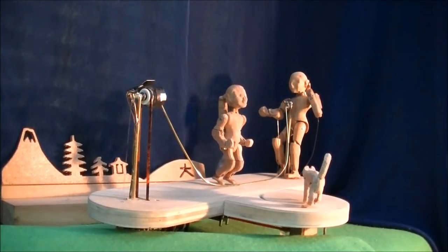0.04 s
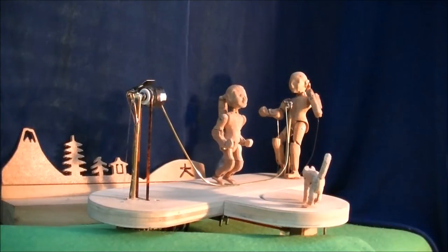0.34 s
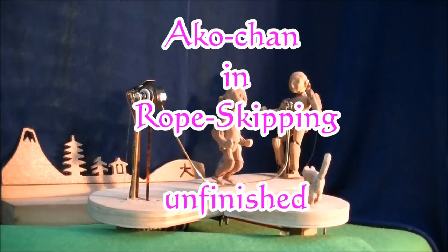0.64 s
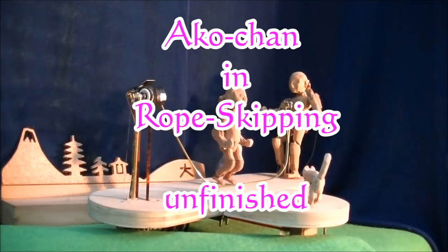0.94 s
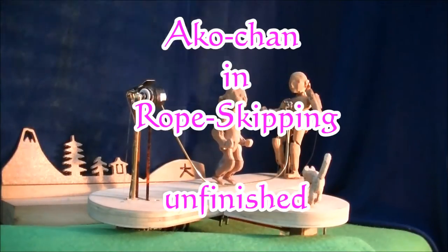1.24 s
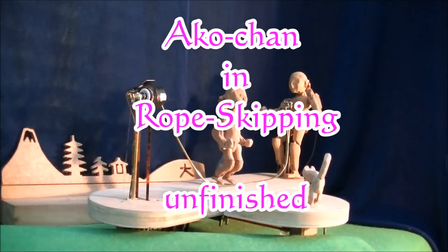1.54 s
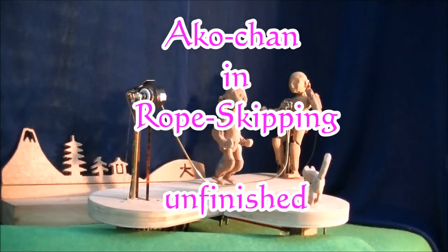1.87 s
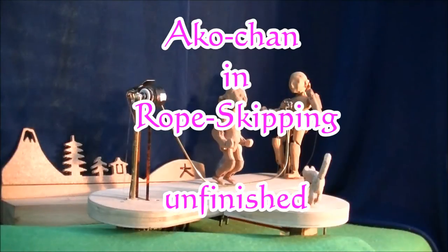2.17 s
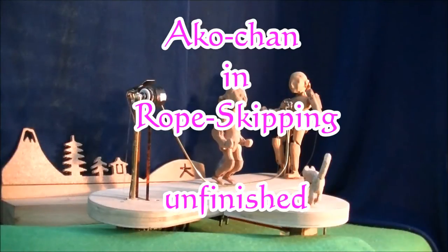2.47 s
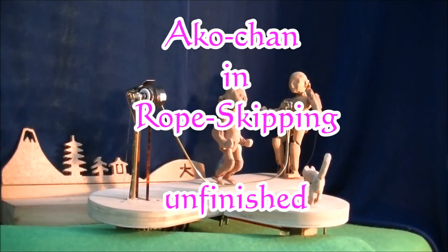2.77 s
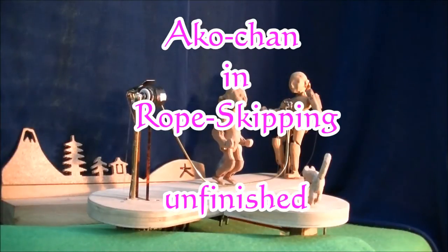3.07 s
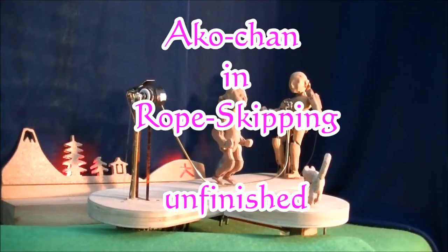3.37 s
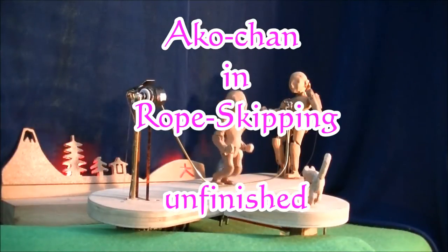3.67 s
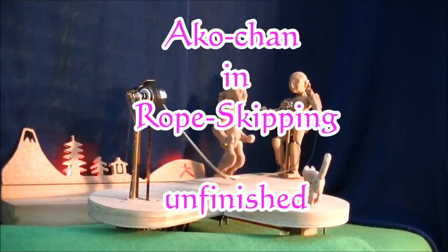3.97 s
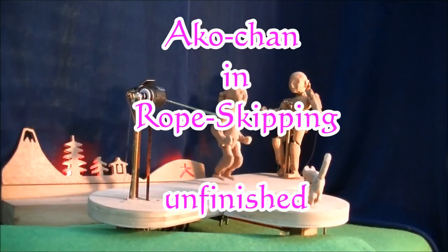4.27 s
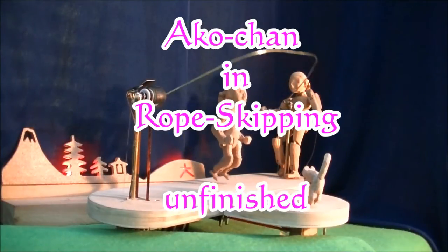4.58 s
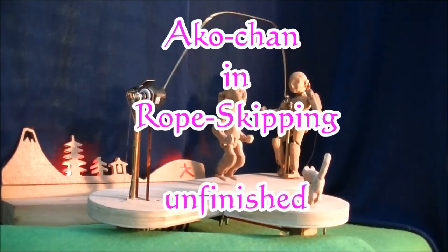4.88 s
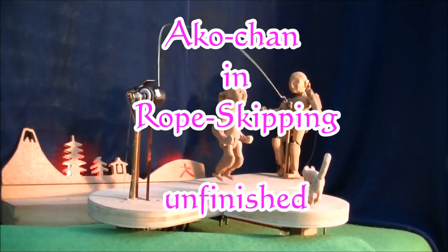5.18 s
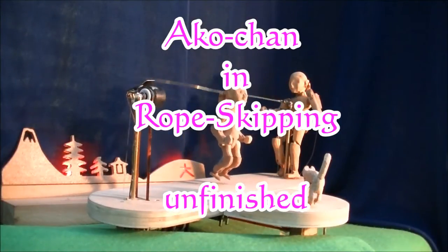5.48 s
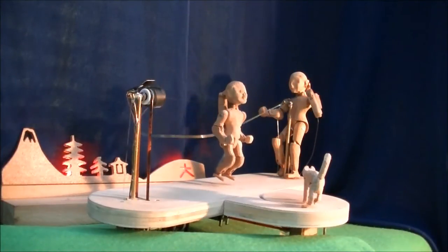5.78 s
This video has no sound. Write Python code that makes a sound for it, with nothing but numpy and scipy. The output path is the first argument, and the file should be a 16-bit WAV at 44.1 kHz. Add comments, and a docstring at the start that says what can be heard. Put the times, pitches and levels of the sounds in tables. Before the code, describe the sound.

Light knocks, ticks and scuffs on wood, followed by a little electric motor and gears whirring steadily in a small room.

```python
"""A small room, a wooden automaton on a table, heard close and near mono over a steady room tone.
Handling rubs, knocks and scuffs the base and rings its modes; sliding parts squeak, metal parts tick.
At 3.4 s its three-pole motor starts: the free gears rasp and a dry bearing squeals. Under the load of
a rope it settles to a whirr of gear teeth, mesh lines and brush hiss, with clacks in step with the shaft.
A low hum joins as the rope falls."""
import sys
import numpy as np
from scipy import signal
from scipy.fft import rfft, irfft, next_fast_len
from scipy.io import wavfile
from scipy.ndimage import uniform_filter1d, map_coordinates

SR = 44100
rng = np.random.default_rng(int(sys.argv[2]) if len(sys.argv) > 2 else 0)


def wav_record(signal):
    """Record a signal, one row per channel, as 16-bit PCM in the file named by sys.argv[1]."""
    frames = np.transpose(np.atleast_2d(signal))
    bounded = np.clip(frames, -1, 1)
    # unit amplitude maps onto the largest positive 16-bit level
    quanta = np.round(bounded * 32767).astype(np.int16)
    wavfile.write(sys.argv[1], SR, quanta)


N = 265482
TIME_S = np.arange(N) / SR


def amp(db):
    """Decibels to gain."""
    return 10 ** (np.asarray(db) / 20)


def unit(x):
    """Scale to rms 1."""
    return x / np.sqrt(np.mean(x ** 2) + 1e-20)


def along(points, hz):
    """Interpolate (Hz, value) points on a log axis."""
    f, v = np.transpose(points)
    return np.interp(np.log(hz + 1), np.log(f + 1), v)


def ramp(start_s, end_s):
    """Linear rise from 0 to 1."""
    return np.clip((TIME_S - start_s) / (end_s - start_s), 0, 1)


def wobble(rate_hz):
    """Smooth random curve, rate_hz knots a second."""
    return map_coordinates(rng.standard_normal(int(N * rate_hz / SR) + 4), [TIME_S * rate_hz])


def filtered(x, response):
    """Apply a frequency response by FFT."""
    n = x.shape[-1]
    m = next_fast_len(n + SR // 4)
    return irfft(rfft(x, m) * response(np.fft.rfftfreq(m, 1 / SR)), m)[..., :n]


def body(modes, f):
    """Causal response of (Hz, width Hz, dB) resonances, alternating in sign."""
    return sum((-1) ** k * amp(db) * 1j * f * width / (hz * hz - f * f + 1j * f * width)
               for k, (hz, width, db) in enumerate(modes))


def above(f, edge_hz, order=4):
    """High-pass gain."""
    return 1 / np.sqrt(1 + (edge_hz / (f + 1)) ** (2 * order))


def below(f, edge_hz, order=4):
    """Low-pass gain."""
    return 1 / np.sqrt(1 + (f / edge_hz) ** (2 * order))


def band(f, hz, width_hz, order=1):
    """Band-pass gain; full width at half height."""
    return 1 / (1 + (2 * (f - hz) / width_hz) ** (2 * order))


def noise(response, size=N):
    """Coloured noise, rms 1."""
    return unit(filtered(rng.standard_normal(size), response))


def add(track, start_s, sound):
    """Mix a sound into a track."""
    at = round(start_s * SR)
    sound = sound[max(-at, 0):]
    part = track[max(at, 0):][:len(sound)]
    part += sound[:len(part)]


# Room tone spectrum. Each row: frequency in Hz, relative density in dB.
AIR_SPECTRUM = [(12, -40), (20, -10.5), (107, -4.5), (176, -7), (254, -7), (570, -15.5), (843, -17.5),
                (1430, -21.5), (3220, -23), (3800, -28), (4500, -24), (7860, -27.5), (15800, -31)]

def room_tone():
    """Steady hiss over a slowly heaving rumble."""
    air = noise(lambda f: amp(along(AIR_SPECTRUM, f)))
    rumble = filtered(air, lambda f: below(f, 133))
    return amp(-67.5) * (air - rumble + rumble * amp(1.3 * wobble(6.4)))


# Low and high modes of the wooden base. Each row: frequency in Hz, width in Hz, gain in dB.
LOW_MODES = [(229, 17, 0.5), (366, 71, -5), (455, 34, 0), (670, 39, -1), (836, 40, 3.5), (976, 25, -3)]
HIGH_MODES = [(1269, 50, 6.5), (1515, 34, 7), (1670, 58, 3), (1882, 82, 1.5), (2187, 51, 2), (2557, 100, 1),
              (2750, 43, 4), (2925, 75, 2), (3470, 77, 1.5), (4230, 120, 2)]

def through_wood(friction, ring_db=8.5):
    """Friction on the base: direct scrape plus the ring of the modes."""
    low = lambda f: sum(body([mode], f) for mode in LOW_MODES)
    high = lambda f: sum(body([mode], f) for mode in HIGH_MODES)
    return amp(-2.5) * filtered(friction, lambda f: 1 + (amp(ring_db) - 1) * (low(f) + amp(-7) * high(f)))


# Sliding friction spectrum. Each row: frequency in Hz, relative density in dB.
FRICTION_SPECTRUM = [(88, -14), (150, -8.5), (318, -13.5), (441, -6.5), (601, -1.5), (649, -9), (1030, -7),
                     (1430, -9.5), (1840, -8.5), (2180, -7), (7500, -10), (15000, -28)]

def rubbing(push_s=1.493, rise_db_per_s=32, fall_db_per_s=26):
    """Faint grainy rubbing swells to one firm push, eases, and ends as the motor starts."""
    t = TIME_S - push_s
    pressure = amp(-69.5) + amp(-54 - np.maximum(-rise_db_per_s * t, fall_db_per_s * t))
    low = amp(-10) * noise(lambda f: amp(along(FRICTION_SPECTRUM, f)) * below(f, 920))
    grain = amp(-5.5 + 1.5 * wobble(200))
    high = grain * noise(lambda f: amp(along(FRICTION_SPECTRUM, f)) * above(f, 1300))
    return through_wood(pressure * (low + high)) * (1 - ramp(3.35, 3.45))


# Sliding parts. Each row: middle in seconds, length in seconds, level in dB, pitch in Hz, width in Hz.
SQUEAKS = [(0.032, 0.061, -59.5, 540, 80), (0.469, 0.15, -67, 2750, 1500), (0.772, 0.056, -65, 1660, 1300),
           (0.828, 0.051, -56.5, 1990, 1000), (1.305, .08, -56, 1950, 200), (1.311, 0.067, -62.5, 412, 60),
           (3.039, 0.02, -64.5, 2127, 600), (3.067, 0.073, -67.5, 1580, 160),
           (3.28, 0.13, -69.5, 1564, 110)]

def squeaks():
    """Husky friction swells and fades in one resonance of the sliding part."""
    out, t = np.zeros(N), np.arange(SR // 2) / SR
    for middle_s, length_s, db, hz, width_hz in SQUEAKS:
        swell = np.exp(-2 * ((t - t.mean()) / length_s) ** 2)
        ring = noise(lambda f: body([(hz, width_hz, 0)], f) * below(f, 6300, order=2), len(t))
        add(out, middle_s - t.mean(), amp(db) * swell * ring)
    return out * amp(1.5 * wobble(150))


# Contact snap spectrum. Each row: frequency in Hz, relative density in dB.
SNAP_SPECTRUM = [(2060, -45.5), (3500, 1.5), (4060, -2), (5450, 2.5), (6210, -2), (6480, -4.5),
                 (8690, -8.5), (11300, -14), (15500, -58)]
# Hard contacts. Each row: start in seconds, level in dB, brightness in dB, ring t60 in seconds,
# pitch in Hz favoured by the spot struck.
CONTACTS = [(0.07, -63.5, 9, 0.16, 3340), (0.797, -52, 11.5, 0.16, 2190), (0.970, -36.5, -6, 0.072, 2300),
            (0.979, -38, -22, 0.048, 1600), (1.03, -40.5, -21, 0.11, 1300),
            (1.054, -42.5, -2.5, 0.08, 2400), (1.0694, -28.5, -0.5, 0.073, 1230),
            (1.344, -50.5, -14, 0.048, 1300), (1.399, -45, 1, 0.074, 2200), (1.403, -43.5, 2.5, .04, 4200),
            (1.434, -50.5, 6, 0.038, 4200), (1.56, -31.5, -12, 0.026, 3460),
            (1.563, -34.5, 3.5, 0.038, 2650), (1.597, -39.5, -5, .07, 1250), (1.612, -45, -3, 0.037, 2700),
            (1.637, -41.5, -13, 0.065, 2180), (3.325, -58.5, 9, .06, 1620),
            (3.580, -37.5, -15, 0.023, 1970), (3.584, -38.5, -15, 0.025, 1750)]

def clicks(favour_db=11.5, snap_t60_s=0.027, crack_t60_s=0.0015, rise_s=0.00038):
    """A hard contact cracks, snaps and rings the base; a bright one moves the low modes less."""
    out, t = np.zeros(N), np.arange(SR // 3) / SR
    low_modes = lambda f: body(LOW_MODES, f) * above(f, 210) * below(f, 1600)
    high_modes = lambda f: (abs(body(HIGH_MODES, f)) + 0.2) * above(f, 950) * below(f, 4000)
    snap_colour = lambda f: amp(along(SNAP_SPECTRUM, f))
    for start_s, db, bright_db, t60_s, hz in CONTACTS:
        knock_db = db - 0.5 - 0.28 * bright_db
        knock = noise(low_modes, len(t)) * amp(knock_db - 60 * t / (0.88 * t60_s))
        ring = noise(lambda f: high_modes(f) * amp(favour_db * band(f, hz, width_hz=460)), len(t))
        ring *= amp(db + 3.5 - 60 * t / t60_s)
        snap = noise(snap_colour, len(t)) * amp(db + bright_db + 1.5 - 60 * t / snap_t60_s)
        crack = noise(lambda f: snap_colour(f) * below(f, 9300, order=2), len(t))
        crack *= amp(-60 * t / crack_t60_s)
        crack = filtered(np.pad(crack, (32, 0)), lambda f: below(f, 12000, order=5))[:len(t)]
        crack_peak_db = 27.52 + 1.36 * db + 1.1 * bright_db  # strong, bright contacts crack most
        crack *= amp(crack_peak_db) / abs(crack).max()
        add(out, start_s, (knock + ring) * (1 - np.exp(-t / rise_s)) + snap + crack)
    return filtered(out, lambda f: above(f, 180))


# Blows to the base. Each row: start in seconds, level in dB, pitch in Hz.
SOFT_BLOWS = [(0.07, -56, 195), (0.782, -47, 135), (1.565, -48, 200), (1.6, -51, 95), (2.246, -48, 300),
              (2.544, -46, 650), (2.886, -51, 260), (3.06, -56, 320), (3.331, -49, 235),
              (3.586, -38.5, 215), (4.296, -50.5, 105), (4.346, -43.5, 92), (4.92, -47.5, 110)]

def bumps(rise_cycles=0.5):
    """A soft blow moves one low, damped mode and a dull spread around it; higher ones die sooner."""
    out, t = np.zeros(N), np.arange(SR // 3) / SR
    for start_s, db, hz in SOFT_BLOWS:
        t60_s = 0.13 * below(hz, 393, order=2)
        mode = np.sin(2 * np.pi * hz * t + 0.4 * wobble(hz / 4)[:len(t)])
        spread = noise(lambda f: above(f, 0.75 * hz, order=3) * below(f, 1.6 * hz, order=3), len(t))
        envelope = amp(db + 3 - 60 * t / t60_s) * (1 - np.exp(-t * hz / rise_cycles))
        add(out, start_s, (0.75 * mode + 0.35 * spread) * envelope)
    return out


# Metal parts. Each row: start in seconds, level in dB, pitch in Hz.
METAL_TICKS = [(0.220, -45.5, 3460), (1.465, -35, 4630), (2.241, -26.5, 4550), (2.296, -39.5, 4080),
               (2.879, -42, 4300), (3.26, -48, 3470)]

def ticks(t60_s=0.063):
    """Small metal parts ring in a cluster of close modes."""
    out, t = np.zeros(N), np.arange(SR // 8) / SR
    for start_s, db, hz in METAL_TICKS:
        ring = noise(lambda f: (band(f, hz, width_hz=900) + 0.18) * below(f, 6500), len(t))
        add(out, start_s, ring * amp(db - 13 - 60 * t / t60_s))
    return out


# Glancing contacts. Each row: start in seconds, level in dB, mid-band t60 in seconds.
GLANCES = [(1.156, -54.5, 0.082), (1.260, -53.5, 0.4), (1.501, -47, 0.17), (1.586, -35.5, 0.25),
           (1.969, -54, 0.11), (1.985, -55, 0.18), (2.121, -49.5, 0.26), (2.498, -58, 0.16),
           (3.928, -50.5, 0.092), (4.579, -49, 0.058)]

def scuffs(rise_s=0.00099):
    """Glancing contacts scrape in grains that ring the wood; the treble dies first."""
    out, t = np.zeros(N), np.arange(SR // 2) / SR
    colour = lambda f: amp(along(FRICTION_SPECTRUM, f))
    for start_s, db, t60_s in GLANCES:
        decay_db = -60 * t / t60_s
        low = noise(lambda f: colour(f) * below(f, 2020), len(t)) * amp(-5.5 + decay_db / 1.83)
        mid = noise(lambda f: colour(f) * above(f, 1300) * below(f, 5200), len(t)) * amp(decay_db)
        high = noise(lambda f: colour(f) * above(f, 2800), len(t)) * amp(-4 + decay_db / 0.71)
        add(out, start_s, amp(db) * (low + mid + high) * (1 - np.exp(-t / rise_s)))
    return through_wood(out * amp(2.1 * wobble(350)))


def surges(turns, pole_db, uneven_db=0):
    """Gain of three surges a turn, one per pole; uneven_db makes one stronger."""
    return amp(pole_db * np.cos(6 * np.pi * turns) + uneven_db * np.cos(2 * np.pi * turns))


def roughness(turns, fresh, points=900):
    """Contact noise that repeats every turn, except for a fresh share of its power."""
    worn = map_coordinates(rng.standard_normal(points), [turns % 1 * points], mode="grid-wrap")
    return np.sqrt(1 - fresh) * unit(worn) + np.sqrt(fresh) * rng.standard_normal(N)


# Gearbox resonances. Each row: frequency in Hz, width in Hz, gain in dB.
GEARBOX_MODES = [(1104, 75, -12.5), (1290, 167, -11.5), (1480, 62, -13.5), (1670, 240, -9.5),
                 (1890, 114, -13), (2020, 100, -7.5), (2378, 215, -3.5), (2543, 210, -5.5), (2973, 190, -9),
                 (2965, 210, -9), (3450, 310, -17), (3882, 134, -8.5), (4570, 740, -14),
                 (5930, 1300, -27.5)]

def gearbox(f):
    """Gearbox gain: sharp resonances, little below 1 kHz."""
    peaks = sum(amp(db) * band(f, hz, width_hz) for hz, width_hz, db in GEARBOX_MODES)
    return (peaks + 0.02) * above(f, 1020, order=12)


def gears(turns, jolts, clacks, loaded, slack_db=-8.5):
    """Pole surges rattle the teeth, which ring the gearbox; its main resonance is weaker unloaded."""
    rattle = roughness(turns, fresh=0.75) * amp(0.5 * wobble(110))
    ring = unit(filtered(rattle, gearbox) * jolts)
    main_band = filtered(ring, lambda f: band(f, 2400, width_hz=1200, order=2))
    ring += main_band * (amp(slack_db * (1 - loaded)) - 1)
    clack_band = filtered(ring, lambda f: above(f, 2100, order=8) * below(f, 4400))
    ring += clack_band * (clacks ** 0.8 - 1)
    return amp(-61 + 9 * loaded) * ring


def drone(falling):
    """Dull midrange noise of the running motor."""
    return amp(-67.5 - 0.75 * falling) * noise(lambda f: above(f, 460, order=1) * below(f, 1630))


# Motor can resonances. Each row: frequency in Hz, width in Hz, gain in dB.
CAN_MODES = [(7160, 280, -2), (8490, 160, 1.5), (9970, 370, 0), (11640, 620, -2.5), (13100, 150, -9),
             (13500, 160, -13)]

def brushes(turns, loaded, falling, whistle_drop_db=2.5):
    """Brushes hiss in the can, louder under load; one resonance fades as the rope falls."""
    can = lambda f: (abs(body(CAN_MODES, f)) + 0.22 * below(f, 9700)) * above(f, 2900)
    friction = roughness(turns, fresh=0.99) * surges(turns, pole_db=1.1, uneven_db=1.0)
    hiss = unit(filtered(friction, can))
    whistle = filtered(hiss, lambda f: band(f, 10100, width_hz=700, order=2))
    hiss += whistle * (amp(whistle_drop_db * (0.5 - falling)) - 1)
    return amp(-68.5 + 5.5 * loaded) * hiss


# Colour of loose teeth. Each row: frequency in Hz, gain in dB.
LOOSE_COLOUR = [(1100, 5), (2000, 4), (2400, 9), (3000, 8), (3450, 16.5), (3900, 11), (4600, 9.5),
                (5600, 15), (6500, 11.5), (7500, 12), (10000, 10), (11500, -10), (15500, -35)]
# Bouts of chatter. Each row: start in seconds, end in seconds, final level in dB, swell in dB per second.
RASP_BOUTS = [(3.39, 3.554, -46.5, 89), (3.58, 3.763, -47, 31)]

def rasp(turns, loaded, spin_up, bite_s=0.008, fade_db_per_s=405):
    """Free gears chatter brightly in their play; each bout swells, then dies as the teeth catch."""
    strikes = roughness(turns, fresh=0.82) * surges(turns, pole_db=0.5, uneven_db=0.6)
    ring = filtered(strikes, lambda f: gearbox(f) * amp(along(LOOSE_COLOUR, f)))
    chatter = unit(ring * amp(1.5 * wobble(300)))
    gain = amp(-59.5) * (1 - loaded) * spin_up  # faint chatter until the load is taken up
    for start_s, end_s, db, swell_db_per_s in RASP_BOUTS:
        t = TIME_S - end_s
        drop_db = np.maximum(-swell_db_per_s * t, fade_db_per_s * t)
        gain += ramp(start_s, start_s + bite_s) * amp(db - drop_db)
    return gain * chatter


# Shaft and mesh lines. Each row: multiple of the shaft rate, then level in dB running free,
# with the rope rising, with the rope falling.
MESH_LINES = [(3, -86, -77, -77), (24, -90, -82, -75), (27, -77, -68.5, -68.5), (30, -78, -65.5, -69),
              (31, -85, -77, -71), (36, -82, -74, -66), (39, -76, -73, -66), (42, -84, -71, -74),
              (48, -80, -63, -67), (51, -82, -66.5, -69), (60, -74, -61, -59.5), (61, -76, -68, -66),
              (63, -78, -66, -67), (72, -61, -70, -68), (73, -70, -74, -66), (76, -80, -65.5, -69),
              (84, -82, -78, -75), (96, -69, -72, -71), (99, -80, -72, -76), (144, -74, -77, -77)]

def mesh_whine(turns, throb, loaded, falling):
    """Shaft and gear mesh sing in lines: the low ones clean, the high ones throbbing."""
    out = np.zeros(N)
    for multiple, free_db, rise_db, fall_db in MESH_LINES:
        db = free_db + (rise_db - free_db) * loaded + (fall_db - rise_db) * falling + wobble(4)
        depth = np.interp(multiple, [45, 60], [0, 1])
        out += amp(db) * throb ** depth * np.sin(2 * np.pi * (multiple * turns + rng.random()))
    return np.sqrt(2) * out


# Bearing resonances. Each row: frequency in Hz, width in Hz, gain in dB.
BEARING_MODES = [(6940, 250, -3.5), (8100, 300, -3), (9300, 400, -3.5), (10200, 370, 0.5),
                 (11600, 250, -18)]
# Squeals. Each row: middle in seconds, length in seconds, level in dB.
BEARING_SQUEALS = [(3.5, 0.02, -62), (3.512, 0.064, -52.5), (3.747, 0.14, -65.5)]

def bearing(turns):
    """The dry bearing sticks and slips with the pole surges and rings in its own resonances."""
    swells = sum(amp(db) * np.exp(-2 * ((TIME_S - middle_s) / length_s) ** 2)
                 for middle_s, length_s, db in BEARING_SQUEALS)
    ring = noise(lambda f: body(BEARING_MODES, f) * above(f, 6000))
    return swells * unit(ring * surges(turns, pole_db=-0.5) * amp(2.5 * wobble(500)))


# Runs of clacks. Each row: start in seconds, end in seconds, pole 0-2, strength in dB.
CLACK_RUNS = [(4.07, 4.2, 2, 4), (4.12, 4.5, 1, 4), (4.24, 4.49, 0, 4.5), (4.5, 5.2, 2, 6),
              (4.75, 5.15, 0, 2.5), (5.26, 5.41, 1, 4), (5.45, 5.62, 2, 4)]

def clacking(turns, width_turns=0.09, fade_s=0.08):
    """Gain peaks: under load, one pole's surge makes the teeth clack on every turn."""
    gain = np.ones(N)
    fade_at = lambda s: ramp(s - fade_s / 2, s + fade_s / 2)
    for start_s, end_s, pole, db in CLACK_RUNS:
        run = fade_at(start_s) - fade_at(end_s)
        offset_turns = (turns - pole / 3 + 0.5) % 1 - 0.5
        gain += (amp(db) - 1) * run * np.exp(-(offset_turns / width_turns) ** 2)
    local_rms = np.sqrt(uniform_filter1d(gain ** 2, size=SR // 10))
    return gain / local_rms ** 0.7  # clacks gather a turn's energy without adding much


def hum(falling, hz=35):
    """A low, wavering hum joins as the rope falls."""
    return amp(-70 + wobble(4)) * falling * np.sin(2 * np.pi * np.cumsum(hz + wobble(5)) / SR)


# Shaft speed. Each row: time in seconds, turns per second.
SHAFT_SPEED = [(3.4, 35.2), (3.48, 40.2), (3.58, 42.6), (3.75, 43.5), (3.84, 41.2), (4.03, 40.6),
               (4.13, 39.4), (4.55, 40.1), (4.66, 39.5), (5.17, 39.7), (5.27, 40.5), (5.59, 39.7),
               (5.76, 40.6), (6.02, 40.6)]

def motor(start_s=3.398):
    """The motor spins up, takes the load, then lets the rope fall; its shaft paces the mechanism."""
    shaft_hz = np.interp(TIME_S, *np.transpose(SHAFT_SPEED)) * (1 + 0.0008 * wobble(25))
    turns = np.cumsum(shaft_hz) / SR - 0.1
    running, loaded, falling = ramp(start_s, 3.412), ramp(3.66, 4.33), ramp(5.2, 5.3)
    spin_up = amp(-10 * (1 - ramp(start_s, start_s + 0.12)))
    jolts, clacks = surges(turns, pole_db=2.2), clacking(turns)
    whirr = gears(turns, jolts, clacks, loaded) + drone(falling) + brushes(turns, loaded, falling)
    chatter = rasp(turns, loaded, spin_up)
    whine = mesh_whine(turns, unit(jolts) * clacks, loaded, falling)
    return hum(falling) + running * (spin_up * (whirr + whine) + chatter + bearing(turns))


# Room decay. Each row: frequency in Hz, t60 in seconds.
ROOM_DECAY = [(150, 0.37), (600, 0.28), (2000, 0.15), (6000, 0.11), (14000, 0.046)]

def walls(x, delay_s=0.006):
    """The small room answers, each frequency dying at its own rate."""
    hz, t, spectrum = signal.stft(rng.standard_normal(SR // 2), SR, nperseg=256)
    decay = amp(-60 * t / along(ROOM_DECAY, hz)[:, None])
    tail = signal.istft(spectrum * decay, SR, nperseg=256)[1]
    return signal.fftconvolve(np.pad(x, (round(delay_s * SR), 0)), tail / np.linalg.norm(tail))[:N]


# Stereo width of the reverb and of the room tone. Each row: frequency in Hz, side gain in dB.
REVERB_WIDTH = [(30, -17), (120, -21), (400, -21.5), (1500, -22.5), (4000, -18), (12000, -32)]
ROOM_TONE_WIDTH = [(50, -4.5), (200, -8), (1000, -2), (4000, -3), (9000, -11.5), (13000, -66)]

def scene():
    """The automaton is near mono, the room tone wider; the bass leans left."""
    hits = clicks() + ticks() + bumps()
    slides = scuffs() + squeaks()
    whirr = motor()
    direct = hits + slides + whirr + rubbing()
    mid = direct + walls(amp(-12) * hits + amp(-8) * slides + amp(-16) * whirr) + room_tone()
    side_reverb = walls(amp(1) * hits + slides + amp(-5) * whirr)
    side = filtered(side_reverb, lambda f: amp(along(REVERB_WIDTH, f) - 2))
    side += filtered(room_tone(), lambda f: amp(along(ROOM_TONE_WIDTH, f)))
    lean = filtered(mid, lambda f: 0.01 + 0.5 * below(f, 86, order=2))
    return np.array([mid + side + lean, mid - side - lean])


def record(dry):
    """Brick-wall low-pass at 15850 Hz."""
    return filtered(dry, lambda f: f < 15850)


dry = scene()
out = record(dry)
wav_record(out)
```